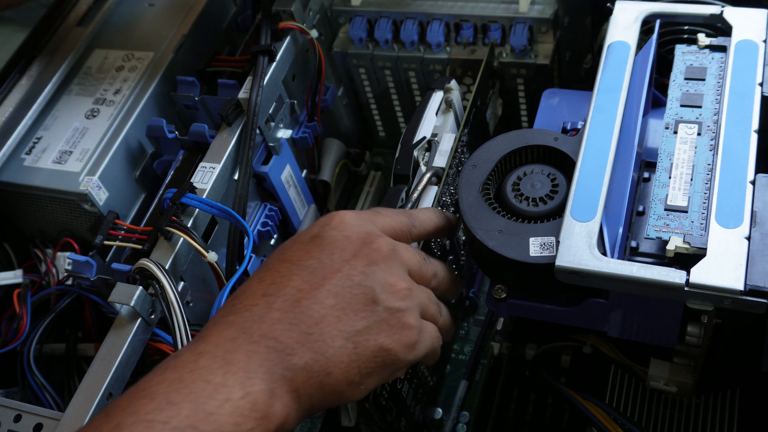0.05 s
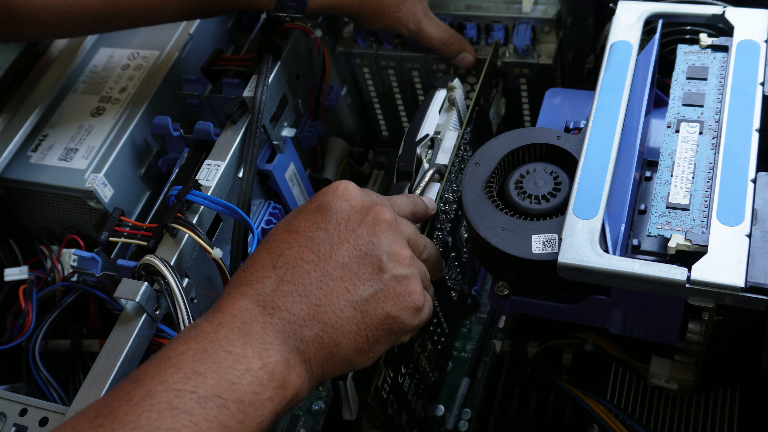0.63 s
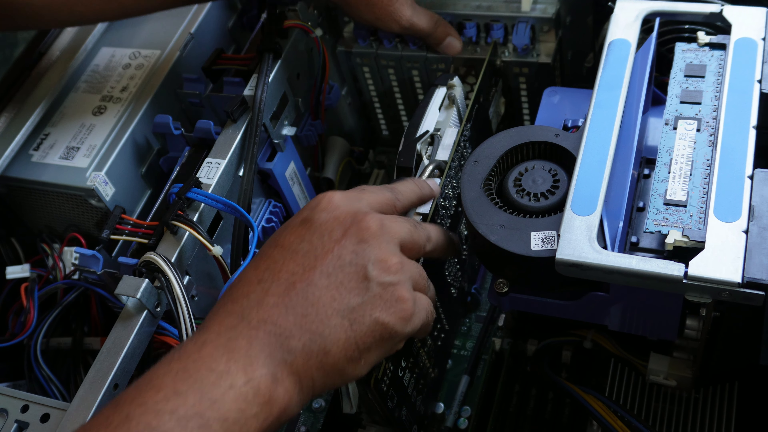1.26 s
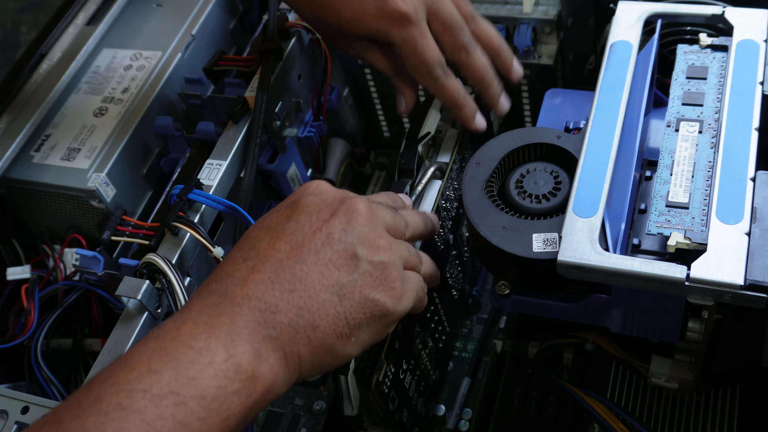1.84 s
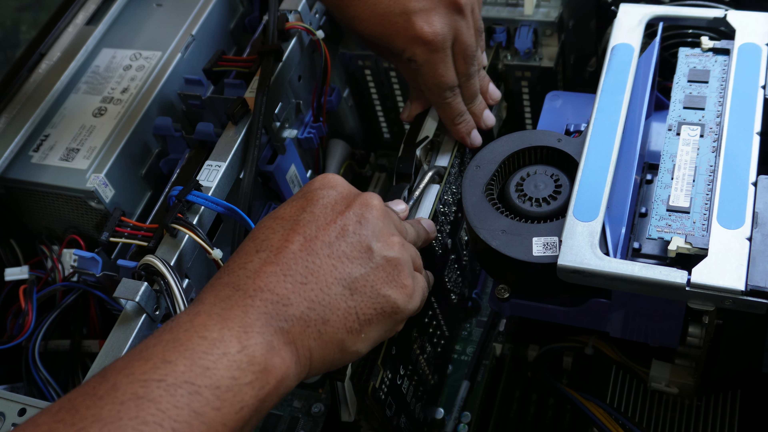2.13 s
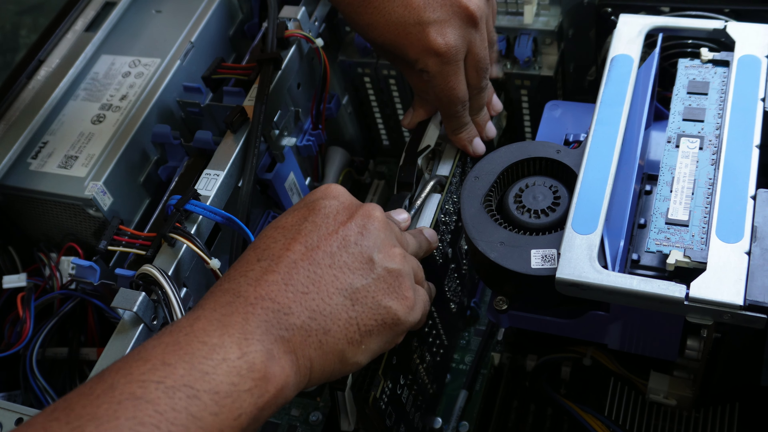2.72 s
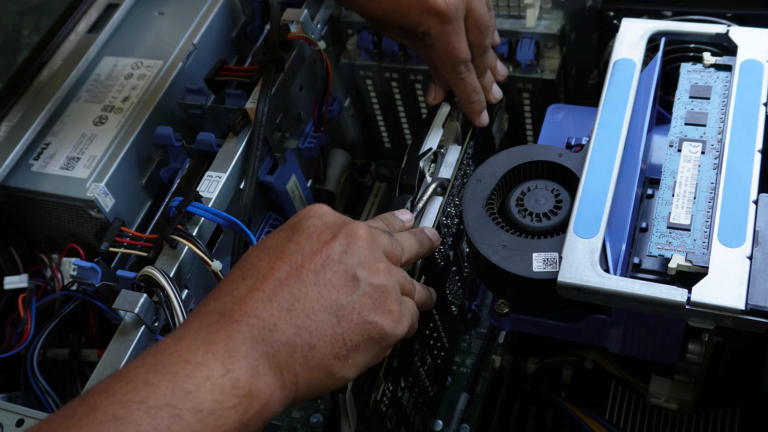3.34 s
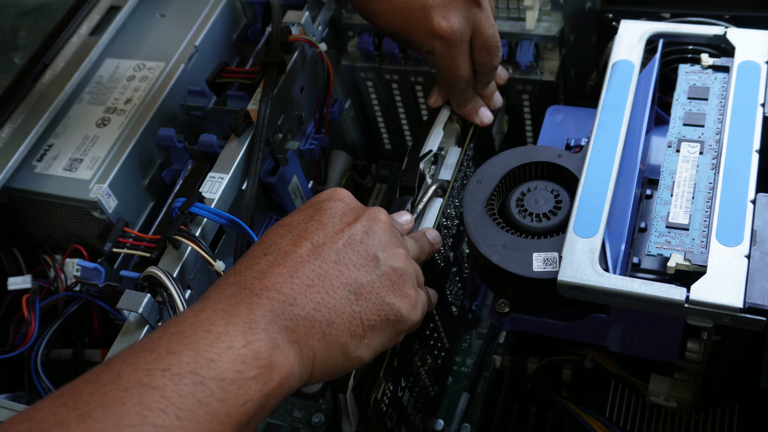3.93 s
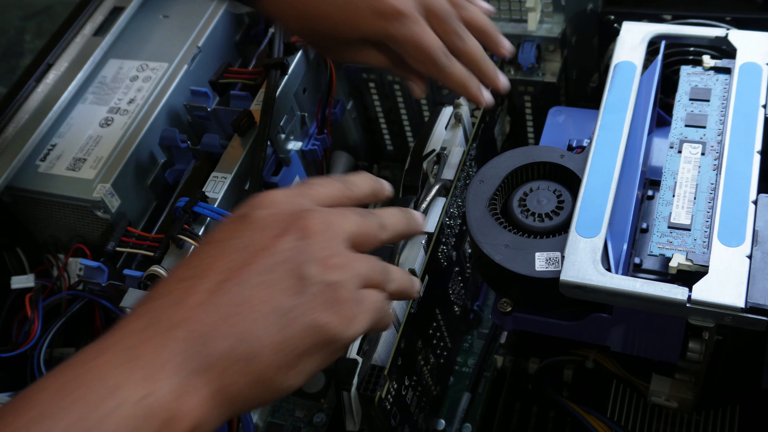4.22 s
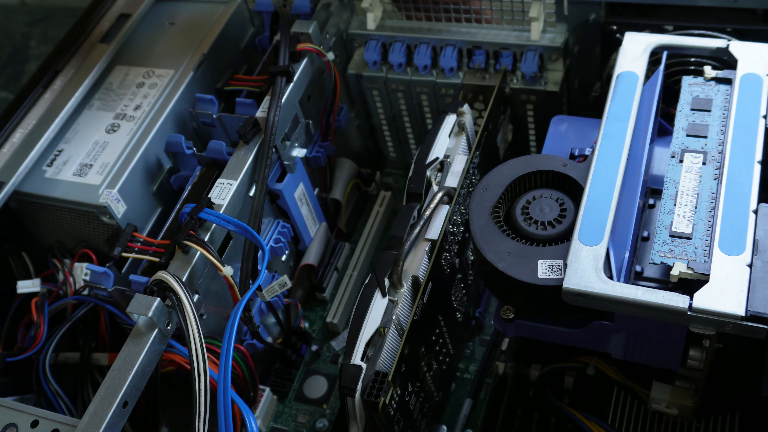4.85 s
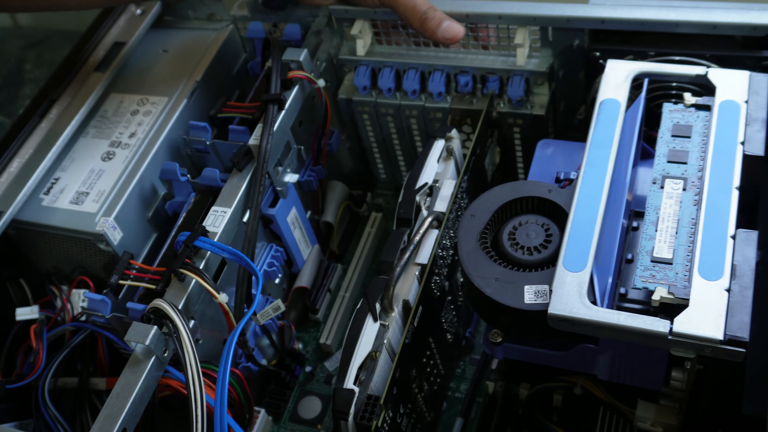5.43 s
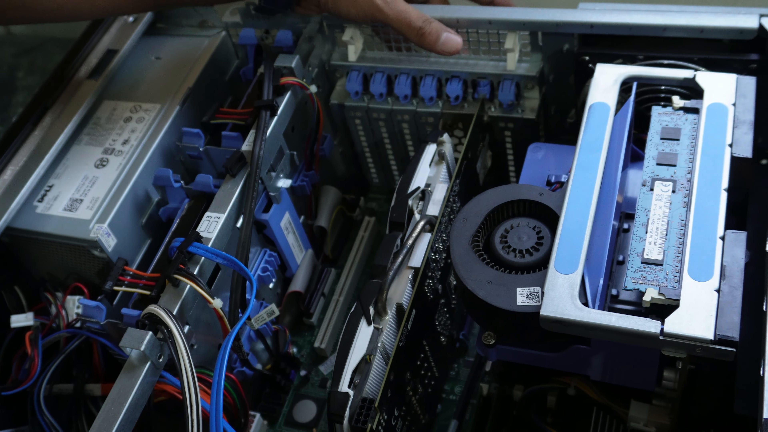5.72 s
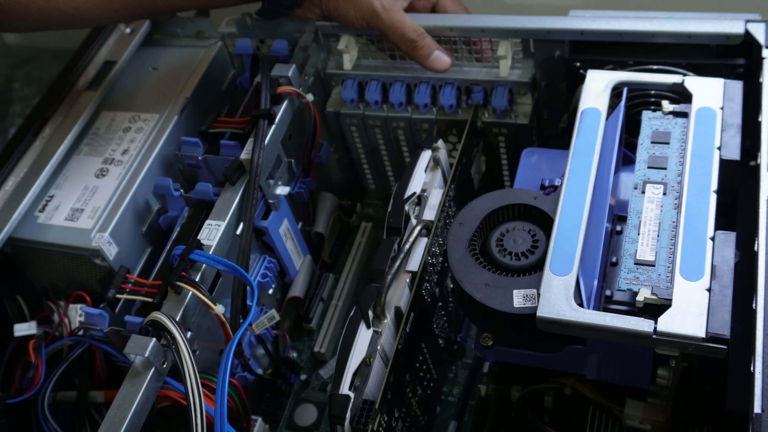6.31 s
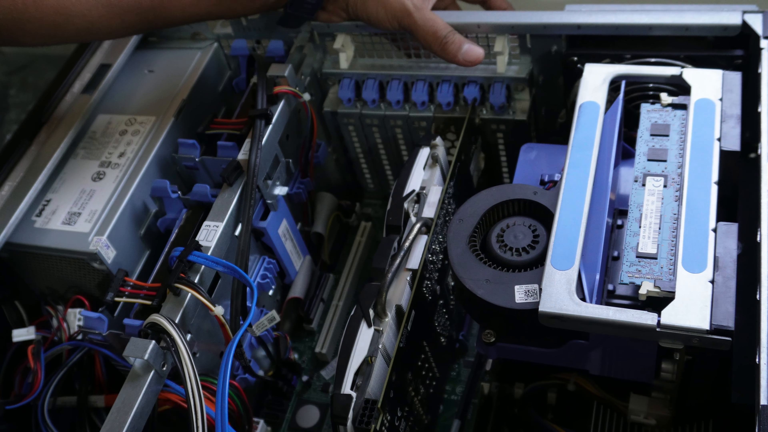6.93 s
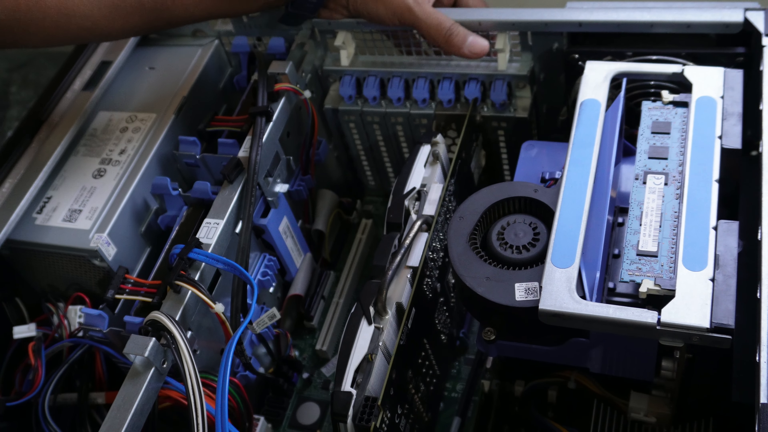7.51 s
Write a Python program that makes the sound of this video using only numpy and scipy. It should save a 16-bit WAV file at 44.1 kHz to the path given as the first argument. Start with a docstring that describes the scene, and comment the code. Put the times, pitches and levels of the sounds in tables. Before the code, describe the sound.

A card clicks and thuds into a computer case slot, then metal ticks and a hissing scrape follow, over steady high hiss.

```python
"""Seating a graphics card

A card is pressed into its slot in an open computer case: the metal bracket grinds and clicks, the
panels thud. Later a hand leans on the frame, which rumbles and ticks; a long hissing scrape follows.
Contacts are noise bursts that ring metal modes; thuds and rumble are low noise driving panel modes.
Behind lie a high hiss that swells twice, a low fluttering murmur, finger rustle and faint squeaks."""
import sys
import numpy as np
from scipy import signal
from scipy.fft import rfft, irfft, next_fast_len
from scipy.io import wavfile
from scipy.ndimage import uniform_filter1d

SR = 44100
rng = np.random.default_rng(int(sys.argv[2]) if len(sys.argv) > 2 else 0)


def dump(signal):
    """Clip the signal to [-1, 1] and save it as 16-bit WAV at the path in sys.argv[1]."""
    limited = np.clip(np.atleast_2d(signal).T, -1, 1)
    pcm = np.round(limited * 32767).astype(np.int16)
    wavfile.write(sys.argv[1], SR, pcm)


N = 338247
TIME = np.arange(N) / SR

# Bracket and sheet-metal frame. Each row: frequency in Hz, relative level in dB, t60 in seconds.
METAL_MODES = [(2580, -11, 0.087), (3320, -13, .05), (3640, -7, .08), (4080, -13, .09), (4500, 5.5, 0.12),
               (4820, 0, .08), (5130, -7, .09), (5550, -9, .08), (5670, -8, .06), (5660, -6, .08),
               (6190, 1, 0.14), (6340, 7, 0.1), (6640, -4, 0.13), (6940, 3, 0.083), (7470, -3, .07),
               (7470, -7, .1), (10400, -13, .025), (10930, -16, .04)]
# Two microphone ports. Each row: frequency in Hz, side minus mid in dB, left minus right in dB.
MIC_PORTS = [(100, -42.5, 9), (246, -22.5, 2), (650, -12, 0), (1320, -20, 1), (2500, -45, 2),
             (4200, -7, -1.5), (5650, -17.5, 0.5), (7160, -5, -3.5), (8500, -2.5, -4), (10200, -3.5, 4),
             (12000, -15.5, 3), (14600, -3.5, -1)]


def undb(db):
    """Decibels to gain."""
    return 10 ** (np.asarray(db) / 20)


def unit(x):
    """Scale to rms 1."""
    return x / np.sqrt(np.mean(x ** 2))


def add(out, start_s, x):
    """Mix x into out."""
    i = int(start_s * SR)
    out[:, i:i + x.shape[1]] += x[:, :N - i]


def fade(x, envelope):
    """Apply an envelope and take on its rms."""
    return unit(x * envelope) * np.sqrt(np.mean(envelope ** 2))


def bell(middle_s, half_s, db):
    """Gaussian rise and fall in gain."""
    return undb(db) * np.exp(-((TIME - middle_s) / half_s) ** 2)


def swells(rows, rest_db):
    """Gain of bells added in power to a resting level."""
    return np.sqrt(undb(rest_db) ** 2 + sum(bell(*row) ** 2 for row in rows))


def walk(rate_hz):
    """Smooth random wander about zero."""
    hold = int(SR / rate_hz)
    steps = np.repeat(rng.standard_normal(N // hold + 1), hold)
    return 1.78 * uniform_filter1d(steps, hold)[:N]


def colour(x, points):
    """Filter by a curve through (Hz, dB) points."""
    n = next_fast_len(x.shape[-1], True)
    hz, db = np.transpose(points)
    gain = undb(np.interp(np.log(np.fft.rfftfreq(n, 1 / SR) + 1), np.log(hz), db))
    return irfft(rfft(x, n) * gain, n)[..., :x.shape[-1]]


def resonate(x, hz, width_hz, stages=2):
    """Equal resonators in series, gain 1 at the centre."""
    for _ in range(stages):
        x = signal.lfilter(*signal.iirpeak(hz, hz / width_hz, fs=SR), x)
    return x


def ring(x, modes, scatter_db=0):
    """Drive decaying modes; scatter stands for the spot touched."""
    t = TIME[:min(SR // 2, x.shape[1])]
    spot_db = scatter_db * rng.standard_normal(len(modes))
    response = sum((-1) ** k * undb(db + spot_db[k] - 60 * t / t60_s) * np.cos(2 * np.pi * hz * t)
                   for k, (hz, db, t60_s) in enumerate(modes))
    return signal.fftconvolve(x, response[None] / np.linalg.norm(response), axes=1)[:, :x.shape[1]]


def rough_tone(hz, width_hz):
    """Narrow noise band along a pitch curve, rms 1."""
    lowpass = signal.butter(2, width_hz / 2, fs=SR, output="sos")
    lead = SR // 10
    wobble = signal.sosfilt(lowpass, rng.standard_normal((2, lead + len(hz))))[:, lead:]
    phase = 2 * np.pi * np.cumsum(hz) / SR
    return unit(wobble[0] * np.cos(phase) + wobble[1] * np.sin(phase))


def stereo_noise(n):
    """Noise at two close ports: alike in the bass, less so in the treble."""
    mid, side = rng.standard_normal((2, n))
    side = colour(side, np.array(MIC_PORTS)[:, :2])
    return np.array([mid + side, mid - side])


def pan(left_minus_right_db):
    """Left and right gains."""
    return undb(np.array([[0.5], [-0.5]]) * left_minus_right_db)


def balance(x):
    """Port colouring: right is stronger near 7 kHz, left near 10 kHz."""
    return np.array([colour(port, [(hz, sign * pan_db / 2) for hz, _, pan_db in MIC_PORTS])
                     for port, sign in zip(x, (1, -1))])


def flicker(x, low_hz, high_hz, depth_db, rate_hz, bands=6):
    """Each band wanders in level on its own."""
    centres_hz = np.geomspace(low_hz, high_hz, bands)
    n = next_fast_len(N, True)
    spectrum, hz = rfft(x, n), np.fft.rfftfreq(n, 1 / SR)
    parts = (irfft(spectrum * np.interp(hz, centres_hz, band), n)[..., :N] for band in np.eye(bands))
    return sum(part * undb(depth_db * walk(rate_hz)) for part in parts)


def ripple(x, taps=7, tap_db=-11, drift_s=0.00002):
    """Fine, slowly drifting spectral ripple that makes the hiss slightly whistly."""
    out = x.copy()
    for port in range(2):
        for delay_s in rng.uniform(0.0015, 0.012, taps):
            source_s = TIME - delay_s - drift_s * walk(1.5)
            out[port] += undb(tap_db) * np.interp(source_s, TIME, x[port], left=0)
    return out * np.std(x) / np.std(out)


def room(x, t60_s, wet_db, build_s=0.021):
    """Add a short diffuse tail from the case and walls."""
    # Each row: frequency in Hz, relative level in dB.
    tail_colour = [(1000, -5), (2500, 4), (3700, 11), (5000, 2.5), (7000, 2), (8500, 0.5), (10500, -0.5),
                   (15000, -14)]
    t = TIME[:SR // 2]
    envelope = undb(-60 * t / t60_s) * (1 - np.exp(-t / build_s))
    tail = colour(rng.standard_normal((2, len(t))), tail_colour) * envelope
    return x + undb(wet_db) * signal.fftconvolve(x, tail / np.linalg.norm(tail[0]), axes=1)[:, :N]


def room_air(level_db=-59):
    """Faint, steady broadband noise."""
    # Each row: frequency in Hz, relative level in dB.
    air_colour = [(25, -42), (60, -15), (90, -10), (120, 8.5), (170, 8), (260, 4.5), (560, -1.5),
                  (950, -0.5), (1300, -5.5), (1700, -2.5), (2500, -6), (4000, -8), (8000, -16)]
    return unit(colour(stereo_noise(N), air_colour)) * undb(level_db)


def murmur(level_db=-55, sink_db_per_s=0.23, waver_db=1.32):
    """Low fluttering murmur with two narrow peaks."""
    # Each row: frequency in Hz, relative level in dB.
    murmur_colour = [(100, -43), (180, -29), (230, 2.5), (275, -0.5), (330, -0.5), (415, -1.5), (480, -7.5),
                     (560, -17.5), (700, -34)]
    # Each row: frequency in Hz, width in Hz, level re the broad band in dB.
    peaks = [(278.6, 32, -7), (410.5, 57, -6.5)]
    broad = colour(rng.standard_normal(N), murmur_colour)
    broad = flicker(broad, low_hz=231, high_hz=480, depth_db=1.5, rate_hz=16)
    noise = rng.standard_normal(N)
    narrow = sum(undb(db) * unit(resonate(noise, hz, width_hz)) for hz, width_hz, db in peaks)
    return unit(unit(broad) + narrow) * undb(level_db - sink_db_per_s * TIME + waver_db * walk(12))


def murmur_blips(width_hz=75):
    """Short, almost tonal blips in the murmur."""
    # Each row: middle in seconds, half length in seconds, level in dB, pitch in Hz.
    blips = [(0.358, 0.029, -50.5, 410), (0.453, 0.033, -49, 410), (0.499, 0.032, -49, 316),
             (1.166, 0.048, -53, 425), (2.062, .035, -51, 415), (2.303, 0.1, -51, 392),
             (2.907, 0.067, -47, 298), (3.02, 0.033, -52, 280), (3.34, 0.02, -52, 398),
             (3.355, 0.028, -49.5, 276), (3.488, 0.059, -50.5, 276.7), (3.679, 0.027, -46.5, 363.4),
             (3.798, .025, -53, 424.6), (3.957, 0.027, -49, 412), (4.119, 0.064, -51.5, 420),
             (4.357, 0.025, -51.5, 416.4), (5.677, 0.033, -52, 409), (6.971, 0.029, -52.5, 413)]
    out = np.zeros((2, N))
    for middle_s, half_s, db, hz in blips:
        t = np.arange(-2 * half_s, 2 * half_s, 1 / SR)
        tone = rough_tone(np.full(len(t), hz), width_hz)
        add(out, middle_s - 2 * half_s, undb(db) * fade(tone, np.hanning(len(t)))[None])
    return out


def high_hiss(level_db=-39.5, waver_db=0.17, swell_pan_db=-3):
    """Hiss with whistly bands; it flickers and swells twice."""
    # Each row: frequency in Hz, relative left level in dB, relative right level in dB.
    port_colours = [(2950, -35, -30.5), (4056, -33.5, -31.5), (4636, -2, -2.5), (5240, 3, 3),
                    (5700, 2.5, -0.5), (5870, -4, -1.5), (6300, -8, 0.5), (6740, -17, -8.5),
                    (7360, -14, -4.5), (7400, -16.5, -4), (7800, -23, -9), (8140, -19.5, -9),
                    (8630, -22.5, -13), (9150, -15.5, -16.5), (9900, -14.5, -23), (10460, -11.5, -26),
                    (10700, -12, -18), (11100, -10.5, -11.5), (12200, -14, -18), (13400, -15.5, -17),
                    (14400, -16.5, -13.5), (15500, -21, -16)]
    # Each row: time in seconds, level offset in dB.
    drift = [(0, -0.5), (.3, -0.5), (.57, -0.1), (.95, 1.4), (1.5, 0), (2.15, 1), (2.45, -0.1), (3.4, 1),
             (3.95, -1), (4.5, -0.9), (5.05, 0.5), (5.17, -1), (5.27, 0.5), (5.37, -1.5), (5.5, 2.5),
             (5.75, -0.5), (6.45, 0.5), (7.67, 0.5)]
    # Each row: frequency in Hz, relative level in dB.
    swell_colour = [(4000, -40.5), (4800, -6.5), (5800, -2.5), (6700, 1), (8000, -8), (9300, -13.5),
                    (11000, -28), (16000, -47)]
    # Each row: middle in seconds, half length in seconds, level in dB.
    bright_swells = [(3.25, 0.83, -38.5), (7.6, 0.89, -44.5)]
    left, right = stereo_noise(N)
    left = colour(left, [(hz, db) for hz, db, _ in port_colours])
    right = colour(right, [(hz, db) for hz, _, db in port_colours])
    drift_db = np.interp(TIME, *np.transpose(drift))
    steady = unit(np.array([left, right])) * undb(level_db + drift_db + waver_db * walk(10))
    bright = unit(balance(colour(stereo_noise(N), swell_colour))) * pan(swell_pan_db)
    hiss = ripple(steady + bright * swells(bright_swells, rest_db=-62))
    return flicker(hiss, low_hz=4040, high_hz=12100, depth_db=1.25, rate_hz=14)


def squeaks():
    """Thin gliding squeaks, some nearly clean, some rough."""
    # Each row: start and length in seconds, start and end pitch in Hz, width in Hz, level in dB.
    glides = [(2.847, .064, 5780, 5820, 40, -38), (3.096, 0.25, 6560, 6630, 120, -45),
              (3.586, 0.087, 5780, 5800, 200, -31.5), (3.62, .12, 6730, 6740, 40, -47),
              (3.807, 0.12, 6620, 6640, 30, -42), (5.923, 0.039, 3370, 3530, 220, -51),
              (5.97, .026, 3500, 3600, 200, -47), (6.698, .3, 3500, 3490, 180, -52.5),
              (7.006, 0.16, 2370, 2710, 60, -49.5), (7.15, 0.27, 2245, 2120, 133, -53)]
    out = np.zeros((2, N))
    for start_s, length_s, from_hz, to_hz, width_hz, db in glides:
        n = int(length_s * SR)
        tone = rough_tone(np.linspace(from_hz, to_hz, n), width_hz)
        add(out, start_s, undb(db) * fade(tone, np.hanning(n))[None])
    return out


def finger_rustle(patch_db=2.5, grain_db=1.2):
    """Fingers slide over card and frame in uneven, grainy patches."""
    # Each row: frequency in Hz, relative level in dB.
    rustle_colour = [(2000, -14), (3500, -17.5), (5000, 1.5), (7000, -1), (11000, -16.5), (16000, -5)]
    # Each row: middle in seconds, half length in seconds, level in dB.
    slides = [(1.1, .3, -62), (2.2, .12, -63), (3.05, 0.85, -49.5), (5.62, .15, -61), (6.45, 1, -43)]
    touch = undb(patch_db * walk(22) + grain_db * walk(400))
    return unit(colour(stereo_noise(N) * touch, rustle_colour)) * swells(slides, rest_db=-58)


def case_panels(rub_db=-3, thud_ring_db=-13, thud_attack_s=0.004):
    """A shifting hand shakes and flexes the case; the card gives and bumps it."""
    # Each row: frequency in Hz, relative level in dB, t60 in seconds.
    panel_modes = [(61.3, 5, 0.13), (105.2, -2.5, 0.72), (127.8, -7, 0.46), (150.5, 2, 0.43),
                   (206, -8, 0.18)]
    # Each row: middle in seconds, half length in seconds, panel level in dB, flex level in dB.
    hand_shifts = [(1.52, 0.17, -61, -63), (5.25, 0.032, -52, -66), (5.47, 0.15, -55.5, -63),
                   (5.794, 0.16, -52, -61), (6.003, .1, -53, -78), (6.25, 0.1, -51.5, -71),
                   (6.64, 0.14, -45.5, -59), (6.93, 0.29, -48, -68), (7.3, 0.22, -57, -74)]
    # Each row: start in seconds, level in dB, push decay in seconds, centre in Hz.
    thuds = [(0.76, -42, 0.022, 133), (0.787, -48, .012, 95), (0.806, -41, 0.036, 118),
             (0.855, -52.5, 0.019, 120), (1.81, -53, 0.032, 146), (2.35, -44.5, 0.017, 162),
             (2.388, -45, 0.036, 144), (2.431, -53, 0.02, 75)]
    # Each row: frequency in Hz, relative level in dB.
    rub_colour = [(20, -40), (40, -32), (65, -18), (100, 7.5), (130, 12), (190, -2), (300, -16),
                  (500, -12.5), (1500, -48), (5000, -90)]
    rub = colour(stereo_noise(N), rub_colour)
    rumble = unit(unit(ring(rub, panel_modes)) + undb(rub_db) * unit(rub))
    out = rumble * swells(np.array(hand_shifts)[:, :3], rest_db=-70.5)
    flex = unit(resonate(rng.standard_normal(N), hz=62, width_hz=38))
    out += flex * sum(bell(middle_s, half_s, db) for middle_s, half_s, _, db in hand_shifts)
    t = TIME[:SR // 2]
    for start_s, db, decay_s, hz in thuds:
        envelope = np.exp(-t / decay_s) * (1 - np.exp(-t / thud_attack_s))
        push = resonate(stereo_noise(len(t)), hz, width_hz=80) * envelope
        thud = unit(push) + undb(thud_ring_db) * unit(ring(push, panel_modes))
        add(out, start_s, thud * undb(db) / np.std(thud[:, :SR // 20]))  # level over the first 50 ms
    return out


def scrape(metal_db=-5, rasp_db=-15):
    """Friction hiss; the metal rings and rasps more as the pressure rises."""
    # Each row: start in seconds, rise in seconds, level in dB, fade in dB/s (negative grows).
    strokes = [(7.174, 0.053, -23, 37.5), (7.472, 0.04, -32, -15)]
    # Each row: frequency in Hz, relative level in dB.
    friction_colour = [(800, -47), (1800, -30), (2900, -41), (3700, -13), (4700, -2.5), (6200, -2.5),
                       (7200, -8), (8600, -14.5), (11000, -13.5), (13500, -20.5), (16000, -19.5)]
    # Each row: frequency in Hz, width in Hz, relative level in dB.
    rasp_bands = [(2165, 120, 2), (2410, 100, -8), (2730, 100, 4.5), (3110, 130, 12), (3560, 180, 4)]
    envelopes = []
    for start_s, rise_s, db, fade_db_per_s in strokes:
        rise = np.clip((TIME - start_s) / rise_s, 0, 1)
        held_s = np.maximum(TIME - start_s - rise_s, 0)
        envelopes.append(rise * undb(db - fade_db_per_s * held_s))
    pressure = np.linalg.norm(envelopes, axis=0)
    bite = pressure.max() * (pressure / pressure.max()) ** 3
    hiss = unit(colour(stereo_noise(N), friction_colour))
    rub = stereo_noise(N)
    rasp = unit(sum(undb(db) * resonate(rub, hz, width_hz) for hz, width_hz, db in rasp_bands))
    metal = unit(ring(rub, METAL_MODES))
    return hiss * pressure + (undb(metal_db) * metal + undb(rasp_db) * rasp) * bite


def knocks():
    """Heavy contacts knock the board and frame: short hollow resonances."""
    # Each row: start in seconds, centre in Hz, width in Hz, level in dB, decay in seconds.
    resonances = [(.620, 3280, 230, -39, 0.0048), (0.765, 420, 780, -47.5, 0.022),
                  (.766, 1445, 130, -45.5, 0.025), (.764, 2080, 140, -39.5, 0.018),
                  (0.774, 2480, 590, -39.5, 0.026), (.7665, 3300, 200, -23, 0.0057),
                  (.772, 4300, 200, -29, .01), (2.351, 2560, 320, -43, 0.011),
                  (2.351, 3220, 300, -49.5, 0.019), (2.352, 1400, 1500, -51.5, .014),
                  (6.1045, 1260, 120, -42.5, 0.011), (6.104, 1700, 790, -47.5, 0.018),
                  (6.1045, 2650, 250, -46, 0.024), (6.1053, 3660, 400, -31.5, 0.021),
                  (6.1045, 5300, 330, -27, 0.0065), (6.1045, 6700, 150, -27, .006)]
    out, t = np.zeros((2, N)), TIME[:SR // 5]
    for start_s, hz, width_hz, db, decay_s in resonances:
        band = resonate(stereo_noise(len(t)), hz, width_hz)
        add(out, start_s, fade(band, np.exp(-t / decay_s)) * undb(db))
    return out


def contact(db, slip_ms, release_ms, low_hz, high_hz, ring_hz, ring_db, pan_db, attack_ms):
    """Metal grinds for a few ms, lets go and rings briefly."""
    # Each row: frequency in Hz, relative level in dB.
    contact_colour = [(300, -1), (1000, -21), (2200, 0), (3300, -10), (5000, 7.5), (7000, 7), (8800, 1.5),
                      (11000, 3.5), (13000, 0.5), (16000, -2)]
    t_ms = 1000 * TIME[:SR // 7]
    grip = np.minimum(t_ms / attack_ms, 1) * np.exp(-np.maximum(t_ms - slip_ms, 0) / release_ms)
    noise = colour(stereo_noise(len(t_ms)), contact_colour)
    bandpass = signal.butter(6, [low_hz, high_hz], "band", fs=SR, output="sos")
    grind = signal.sosfilt(bandpass, noise) + undb(-31) * noise  # slight out-of-band leak
    grind += undb(ring_db) * resonate(grind, ring_hz, width_hz=1000, stages=1)
    burst = np.array([fade(port, grip) for port in grind]) * undb(db) * pan(pan_db)
    return burst + undb(-17) * ring(burst, METAL_MODES, scatter_db=2.5)


def bracket():
    """The card grinds into its slot, latch and frame tick; the open case scatters the sound."""
    # Each row: start in seconds, level in dB, slip and release in ms, low edge, high edge and
    # ring in Hz, left minus right in dB.
    seating = [(0.7628, -22.5, 9.6, 1.8, 2600, 15000, 5900, 0),
               (0.7758, -21.5, 6.5, 1.8, 2580, 15000, 5200, 2),
               (0.786, -27.5, 5.1, 1.6, 2190, 13000, 4740, -2), (1.398, -33, 4, 1.8, 4600, 14000, 7350, -3),
               (2.349, -24, 5.3, 2.1, 4300, 14400, 6400, -1), (2.3542, -30, 5, 1.8, 4200, 14000, 5800, 6)]
    # Each row: as in seating, with ring gain in dB before the last column.
    ticks = [(2.856, -30, 2, 1.8, 4300, 12000, 5750, 17, -6),
             (3.6206, -33, 4.2, 3, 5070, 9000, 5900, 12, -4),
             (4.185, -43.5, 6, 1.8, 8500, 13000, 10700, 2, -1),
             (4.9283, -29.5, 2.3, 1.8, 4330, 7000, 5400, 15, -2),
             (4.9275, -28.5, 2.4, 1.6, 8000, 13000, 10700, 9, 0),
             (5.129, -31.5, 4.2, 4, 5940, 12000, 10400, 7, 0),
             (5.158, -39, 3, 1.8, 7000, 12600, 10500, -2, -2),
             (5.438, -30.5, 1.6, 2.6, 4550, 12500, 10000, 9, 0),
             (5.503, -21.5, 2.1, 1.5, 5300, 17500, 7550, 2, 2),
             (5.5745, -28, 1.8, 1.6, 6500, 13500, 11100, 4, 0),
             (5.7655, -40, 3, 1.6, 8000, 12500, 10400, 4, 3),
             (5.836, -27, 4.9, 2, 5100, 12500, 10500, 5, -1),
             (6.098, -25, .6, 1.2, 7500, 12000, 10300, 2, 0),
             (6.1044, -11.5, 2.4, 1.2, 3460, 15000, 10300, 1, 1),
             (6.108, -17.5, 1.1, 1.3, 3540, 12100, 6300, -2, -1),
             (6.8239, -23, 4.6, 1.4, 4700, 12300, 11200, 1, 1),
             (6.8327, -18.5, 2.5, .8, 5000, 15000, 7300, 5, 0),
             (7.0844, -38, 9, 1.8, 7460, 12500, 10800, 2, 0)]
    out = np.zeros((2, N))
    for start_s, *grind, pan_db in seating:
        add(out, start_s, contact(*grind, ring_db=-7, pan_db=pan_db, attack_ms=2.4))
    for start_s, *tick in ticks:
        add(out, start_s, contact(*tick, attack_ms=0.17))
    return room(out, t60_s=0.064, wet_db=-5, build_s=0.0018)


def scene():
    """All sources at the microphone."""
    handling = room(squeaks(), t60_s=0.27, wet_db=-12)
    handling += room(bracket(), t60_s=0.24, wet_db=-15)
    handling += room(knocks(), t60_s=0.1, wet_db=-18)
    handling += scrape() + finger_rustle()
    return balance(handling) + case_panels() + room_air() + high_hiss() + murmur() + murmur_blips()


def record(dry):
    """Steep low-pass at 15.8 kHz."""
    return signal.sosfilt(signal.ellip(10, 0.2, 70, 15800, fs=SR, output="sos"), dry)


dry = scene()
out = record(dry)
dump(out)
```